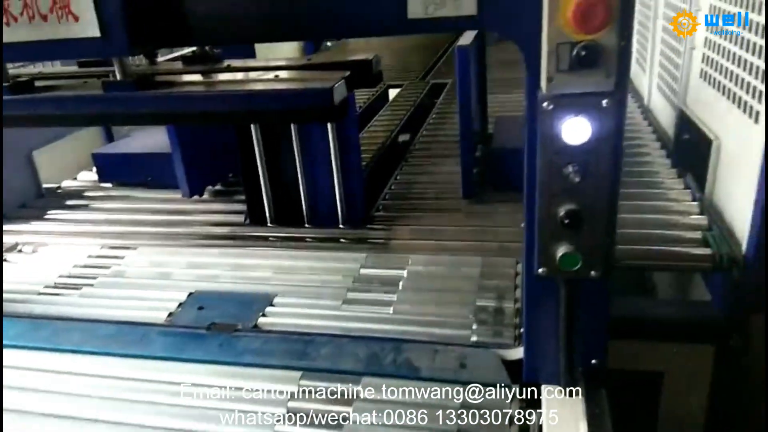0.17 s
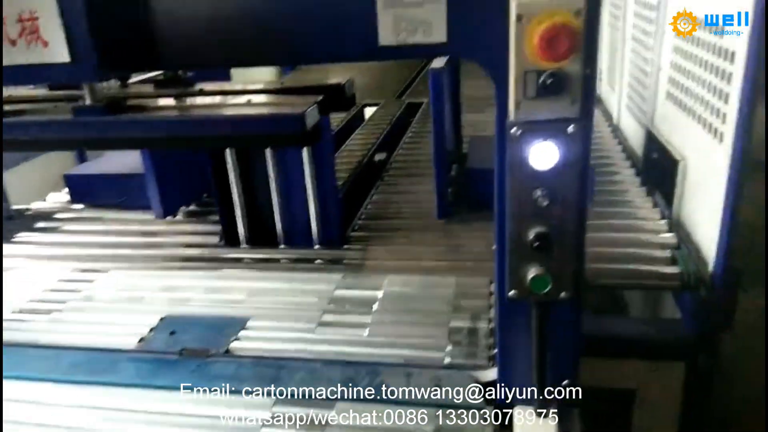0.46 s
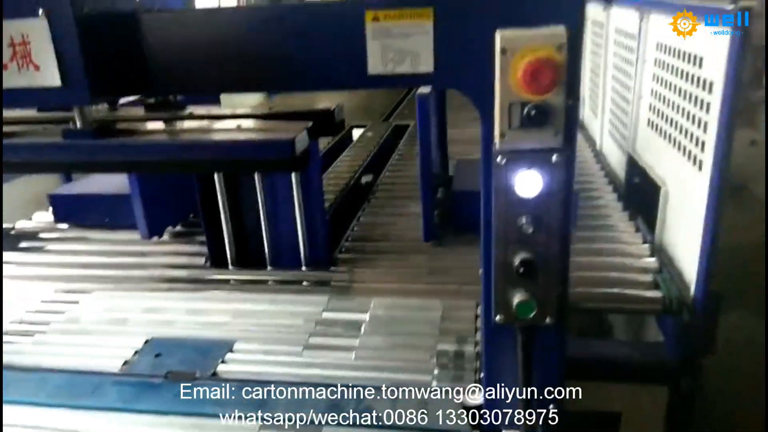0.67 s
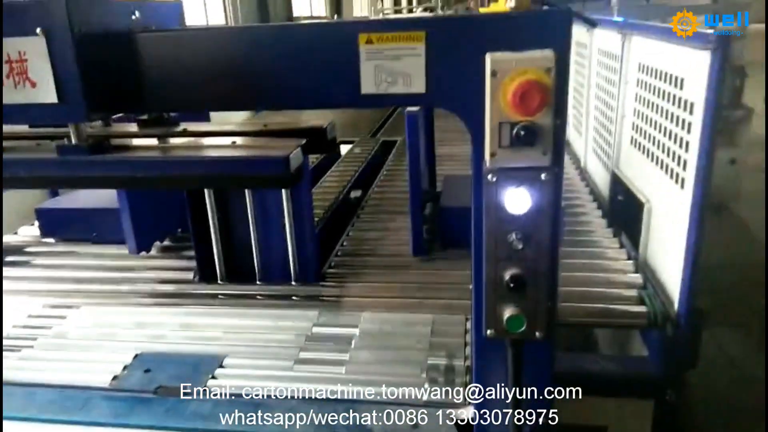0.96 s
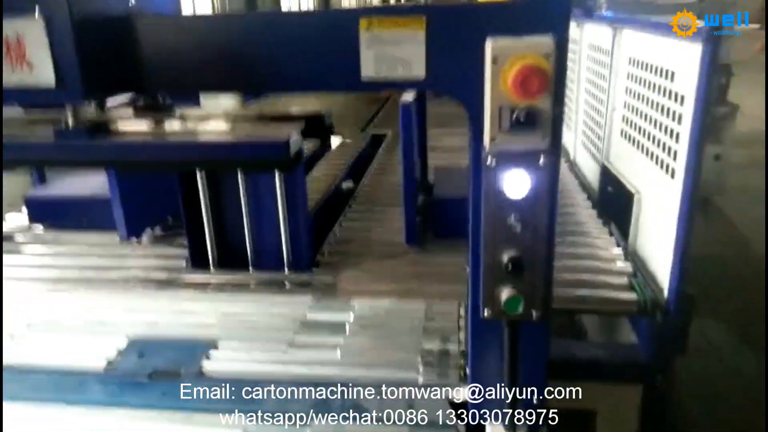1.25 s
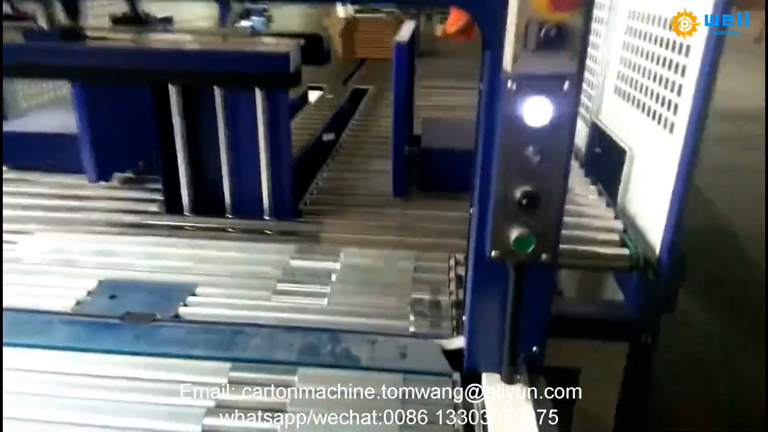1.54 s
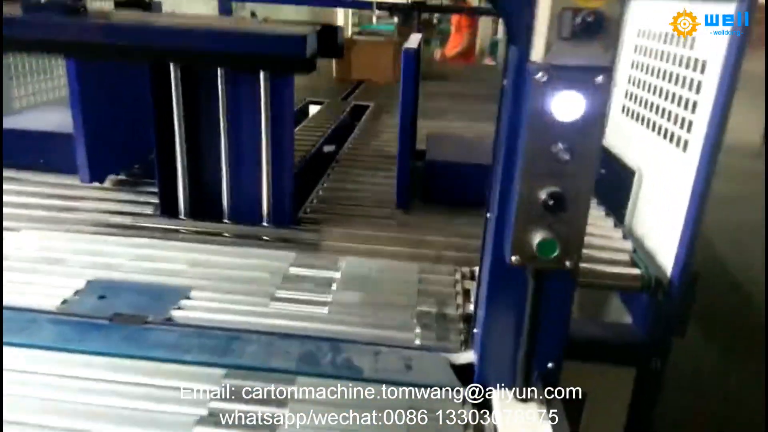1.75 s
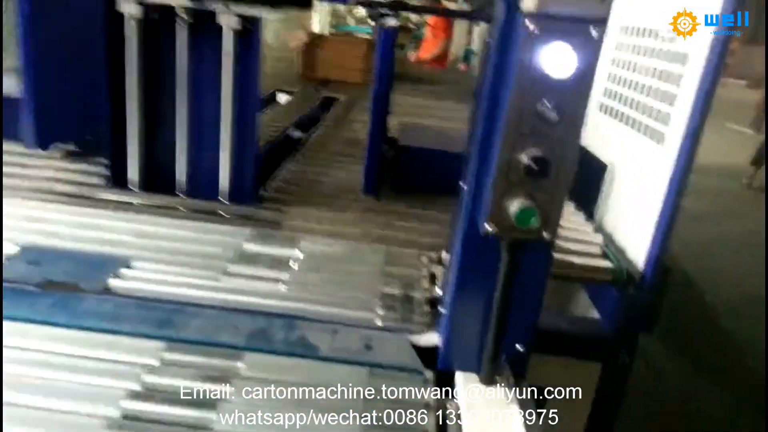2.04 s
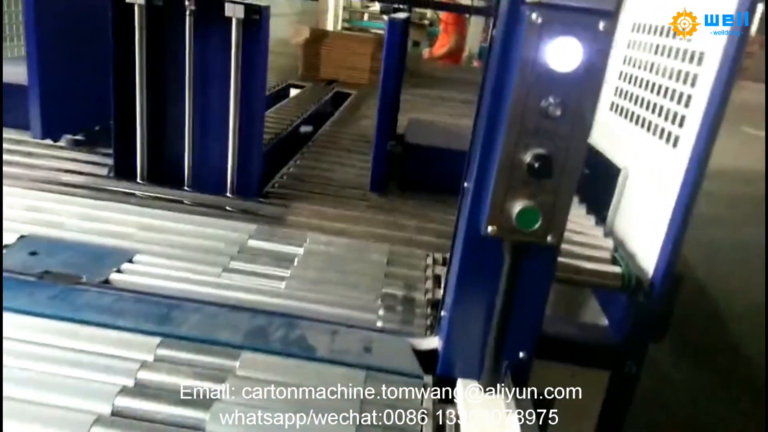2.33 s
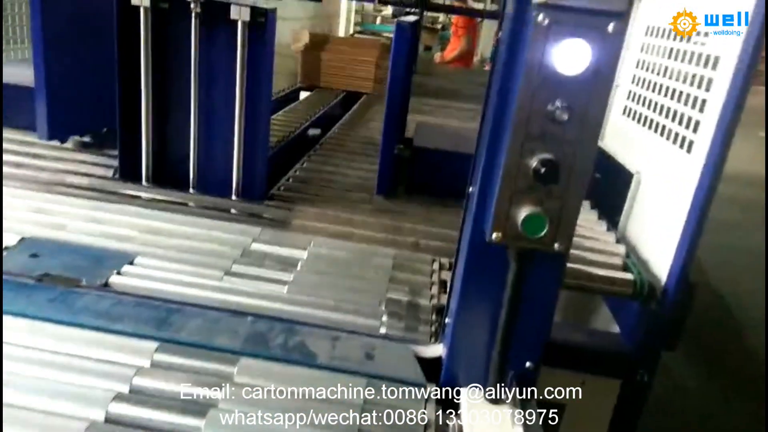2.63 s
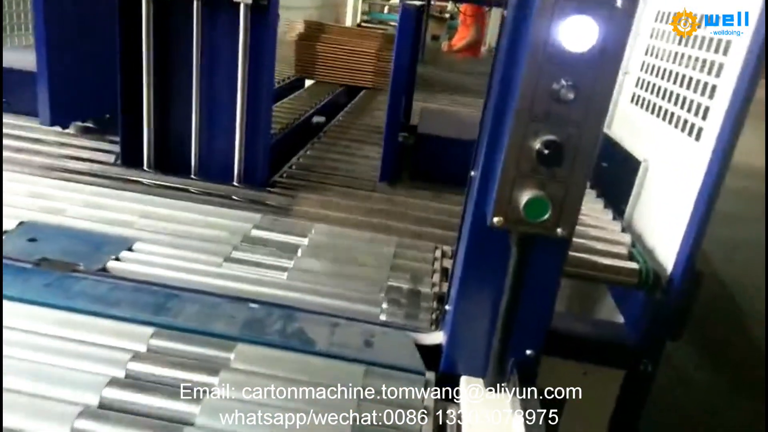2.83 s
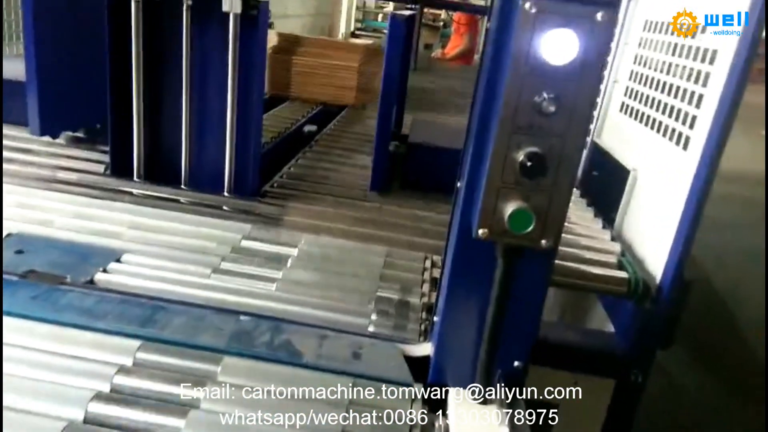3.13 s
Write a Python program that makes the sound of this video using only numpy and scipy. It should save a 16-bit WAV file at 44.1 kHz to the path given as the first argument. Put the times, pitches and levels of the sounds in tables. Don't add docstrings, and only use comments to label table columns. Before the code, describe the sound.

A carton folding machine carriage rattles on steel rails from the start, with a puff of air, and slams with bounces at 0.32 s. A second stroke from 0.57 s squeaks and sings over scraping cardboard, slamming harder and brighter at 0.94 s. Then rollers knock and jingle, busier from 1.7 s, with a faint air vent at 1.5 s and a thud and card scrape at 3.1 s; factory hum behind.

```python
import sys
import numpy as np
from scipy import signal
from scipy.fft import rfft, irfft
from scipy.io import wavfile

SR = 44100
rng = np.random.default_rng(int(sys.argv[2]) if len(sys.argv) > 2 else 0)


def makeup_ratio(level_db):
    decades = np.asarray(level_db, float) / 20
    return 10 ** decades


def persist_wave(psi):
    counts = np.round(np.clip(psi, -1, 1) * 32767).astype(np.int16)
    wavfile.write(sys.argv[1], SR, np.atleast_2d(counts).T)


N = 145089
TIME = np.arange(N) / SR

# (time [s], level [dB])
CONVEYOR_LOAD = [(0, -29), (.06, -50), (.3, -40.5), (.66, -38.5), (.71, -32), (.92, -32), (1.05, -36),
                 (1.58, -42), (1.7, -35), (1.9, -37), (2.2, -36), (2.26, -37), (2.55, -31.5), (2.62, -33.5),
                 (2.75, -30.5), (2.92, -36), (3.4, -31)]
# (frequency [Hz], density [dB per Hz])
LIGHT_STOP = [(290, -23), (700, -12), (1000, -12.5), (1420, -4.5), (2100, -15.5), (2730, -12), (3850, -3),
              (7860, -15), (14500, -19)]


def rms_one(x):
    return x / np.sqrt(np.mean(x ** 2) + 1e-20)


def curve(rows):
    s, db = np.transpose(rows)
    return makeup_ratio(np.interp(TIME, s, db, left=db[0] - 20, right=db[-1] - 60))


def noise():
    return rng.standard_normal(N)


def colour(x, points):
    hz, db = np.transpose(points)
    log_hz = np.log(np.arange(N // 2 + 1) * SR / N + 1)
    gain = makeup_ratio(np.interp(log_hz, np.log(hz), db))
    return rms_one(irfft(rfft(x) * gain, N))


def drift(rate):
    r = np.exp(-80 * np.pi * rate / SR)
    slow = signal.lfilter([1], [1, -2 * r, r * r], rng.standard_normal(N // 40 + 2002))[2000:]
    return np.interp(np.arange(N) / 40, np.arange(len(slow)), rms_one(slow))


def lowpass(x, order, cut_hz):
    return signal.sosfilt(signal.butter(order, cut_hz, fs=SR, output="sos"), x)


def dull(x):
    return lowpass(x, 4, 6150)


def resonate(x, hz, width_hz):
    r = np.exp(-np.pi * width_hz / SR)
    poles = [1, -2 * r * np.cos(2 * np.pi * hz / SR), r * r]
    return signal.lfilter([(1 - r * r) / 2, 0, (r * r - 1) / 2], poles, x)


def body(make, peaks, flicker_db, rate):
    out = np.zeros(N)
    for hz, width_hz, db in peaks:
        flicker = makeup_ratio(db + flicker_db * drift(rate))
        out += flicker * rms_one(resonate(make(), hz, width_hz))
    return rms_one(out)


def grains(per_s, spread_db):
    hits = rng.random(N) < per_s / SR
    size = makeup_ratio(spread_db * np.minimum(rng.exponential(1, N), 3))
    return hits * size * rng.choice([-1, 1], N) + 1e-9


def envelope(s, db, rise, t60):
    out, first = np.zeros(N), int(s * SR)
    t = np.arange(min(N - first, int((rise + 1.5 * t60) * SR))) / SR
    out[first:first + len(t)] = makeup_ratio(db) * np.minimum(t / rise, makeup_ratio(-60 * (t - rise) / t60))
    return out


def hall(x):
    t = np.arange(SR) / SR
    tail = rng.standard_normal(SR) * makeup_ratio(-60 * t / 0.61) * np.clip(t / 0.005, 0, 1)
    tail = lowpass(tail, 1, 6200)
    return makeup_ratio(-11.5) * signal.fftconvolve(x, tail / np.sqrt(np.sum(tail ** 2)))[:N]


def background():
    # (frequency [Hz], density [dB per Hz])
    wash = [(530, -5.5), (900, -4.5), (1350, -7.5), (2210, -7), (3620, -10.5), (6060, -10.5), (6350, -16.5),
            (8780, -18.5), (15800, -32)]
    # (frequency [Hz], density [dB per Hz])
    roar = [(25, -17), (60, -8.5), (260, -2), (420, -13.5), (650, -6.5), (950, -25), (1400, -59)]
    # (time [s], level [dB], rise [s], t60 [s])
    far_clatter = [
        (1.53, -48, 0.017, 0.84),
        (1.862, -50, 0.014, 0.22),
        (2.608, -44, 0.0079, 0.96),
    ]
    clatter = sum(envelope(*row) for row in far_clatter) * dull(colour(noise(), wash))
    far = clatter + makeup_ratio(-49.5) * colour(noise(), wash) + makeup_ratio(-41.5) * colour(noise(), roar)
    edges_hz = 20 * 2 ** np.arange(0, 10.1)
    out = np.zeros(N)
    for edge in zip(edges_hz, edges_hz[1:]):
        octave = signal.sosfilt(signal.butter(1, edge, "band", fs=SR, output="sos"), far)
        out += makeup_ratio(2 * drift(18.0)) * octave
    motor_hz, motor_width_hz = 5980, 42
    whine = resonate(resonate(noise(), motor_hz, motor_width_hz), motor_hz, motor_width_hz)
    return out + makeup_ratio(-61.5) * rms_one(whine)


def rollers():
    # (frequency [Hz], width [Hz], level [dB])
    frame = [(140.4, 12, -5.5), (180.5, 61, -6), (212, 41, -7), (266, 15, -0.5), (339.3, 33, -5),
             (577, 17, -9.5), (661, 69, -6), (767, 65, -12.5)]
    # (time [s], level [dB])
    drone = [(0, -50), (.22, -56), (.9, -42), (1.3, -43.5), (1.55, -54), (1.7, -42), (2.35, -46),
             (2.55, -42), (3.15, -36), (3.24, -34), (3.4, -44)]
    # (time [s], peak level [dB], pitch [Hz])
    knocks = [(0.061, -23, 326), (0.347, -31, 155), (0.674, -29, 170), (0.713, -19, 247),
              (0.749, -18.5, 223.6), (0.856, -23, 252), (0.884, -35, 287), (0.909, -27, 271),
              (1.224, -26, 253), (1.349, -23, 245), (1.624, -30.5, 195), (1.688, -22.5, 191),
              (1.733, -20, 262), (1.766, -21, 275), (1.823, -21, 228), (1.862, -23.5, 270),
              (1.954, -28, 224), (1.989, -27.5, 149), (2.126, -27.5, 261), (2.255, -20, 267),
              (2.306, -24.5, 252), (2.342, -24, 274), (2.404, -23, 186), (2.457, -25, 183),
              (2.486, -24, 307), (2.525, -22, 264), (2.555, -21.5, 182), (2.711, -20, 210),
              (2.808, -23.5, 245), (2.966, -29, 291), (3.042, -25, 246), (3.164, -25, 254),
              (3.243, -24.5, 285)]
    # (time [s], peak level [dB], pitch [Hz])
    taps = [(0.321, -29, 710), (0.459, -28, 774), (0.637, -29.5, 520), (0.813, -30, 495), (0.899, -36, 683),
            (1.799, -35, 670), (1.914, -32.5, 586), (1.959, -42, 587), (2.029, -29, 653), (2.107, -31, 656),
            (2.539, -36, 650), (2.675, -26, 672), (2.703, -26.5, 555), (2.787, -30.5, 560),
            (2.884, -31.5, 690), (2.921, -35, 548), (2.961, -27, 592), (3.008, -22, 570), (3.043, -32, 588),
            (3.107, -24.5, 674), (3.117, -33, 676), (3.141, -28, 563), (3.233, -26.5, 579)]

    def hit():
        return rms_one(grains(per_s=74, spread_db=3)) + 0.98 * noise()

    rumble = makeup_ratio(-0.5) * curve(CONVEYOR_LOAD) * body(hit, frame, flicker_db=4.0, rate=11.6)
    out = lowpass(rumble, 4, 1200)
    drive = resonate(resonate(noise(), 66, 27), 66, 174)
    out += curve(drone) * makeup_ratio(-0.5) * rms_one(drive)
    for table, trim_db, cycles in (knocks, -1.5, 27), (taps, -1, 72):
        for s, db, hz in table:
            out += envelope(s, db + trim_db, 1.2 / hz, cycles / hz) * np.sin(2 * np.pi * hz * (TIME - s))
    return out


def jingle():
    # (frequency [Hz], width [Hz], level [dB])
    parts = [(2190, 100, -1), (2580, 150, 0), (2880, 130, 0.5), (3570, 130, -9.5)]

    def tick():
        return resonate(grains(per_s=70, spread_db=1.14), 3000, 1400)

    return makeup_ratio(-21) * curve(CONVEYOR_LOAD) * dull(body(tick, parts, flicker_db=0.0, rate=6.9))


def cardboard():
    # (time [s], level [dB], rise [s], t60 [s])
    scrapes = [
        (0.699, -29.5, 0.0099, 0.68),
        (3.131, -28, 0.038, 0.26),
        (3.225, -42, 0.012, 0.2),
        (3.252, -41, 0.0066, 0.12),
        (3.271, -42.5, .008, 0.26),
    ]
    # (frequency [Hz], width [Hz], level [dB])
    first_sheet = [(1010, 93, 8), (1210, 51, 4), (1463, 35, -10), (1880, 100, -1)]
    # (frequency [Hz], width [Hz], level [dB])
    second_sheet = [(1206, 91, 2), (1857, 70, -0.5), (2080, 74, -3), (2566, 96, -0.5), (2830, 69, -17),
                    (4320, 150, -11)]
    # (frequency [Hz], density [dB per Hz])
    card = [(530, -42), (900, -21), (1190, 1), (1840, -2), (2340, -18), (2600, -10), (3100, -14),
            (12000, -53), (15600, -76), (22000, -120)]

    def rub():
        return grains(per_s=5000, spread_db=2.7)

    def rubbed(sheet):
        return body(rub, sheet, flicker_db=0.5, rate=46) + makeup_ratio(-5.0) * colour(rub(), card)

    later = sum(envelope(*row) for row in scrapes[1:])
    return dull(envelope(*scrapes[0]) * rubbed(first_sheet) + later * rubbed(second_sheet))


def valves():
    # (time [s], level [dB], rise [s], t60 [s])
    vents = [
        (0.046, -34.5, .002, .3),
        (.062, -35, 0.021, 0.92),
        (1.488, -41.5, 0.016, 1),
    ]
    # (frequency [Hz], density [dB per Hz])
    air = [(2000, -29), (3500, -8.5), (5440, -2.5), (8000, -6), (10500, -8), (14900, -14), (16000, -28)]
    return sum(envelope(*row) for row in vents) * colour(noise(), air) * makeup_ratio(0.5 * drift(41))


def thud():
    # (time [s], level [dB], rise [s], t60 [s], pitch [Hz])
    booms = [
        (0.941, -14.5, 0.023, 0.11, 248.5),
        (3.102, -16.5, 0.0046, 0.056, 268),
    ]
    out = np.zeros(N)
    for s, db, rise, t60, hz in booms:
        out += envelope(s, db, rise, t60) * np.sin(2 * np.pi * hz * (TIME - s))
    return out


def carriage():
    # (time [s], level [dB])
    first_stroke = [(0, -34), (.02, -34), (.04, -30.5), (.12, -32.5), (.2, -40), (.3, -40), (.45, -36.5),
                    (.56, -41.5), (.6, -59)]
    second_stroke = [(.55, -46), (.575, -36), (.64, -38), (.72, -36.5), (.85, -39), (.93, -38), (.96, -46)]
    # (frequency [Hz], width [Hz], level [dB])
    first_rail = [(2310, 60, -7), (2835, 61, -3.5), (3780, 370, -2), (4520, 190, 0), (5230, 160, -1.5),
                  (5930, 230, -11)]
    second_rail = [(4500, 440, -2), (4150, 490, 4.5), (5250, 500, 0), (6200, 200, -9)]
    # (frequency [Hz], density [dB per Hz])
    steel = [(180, -23), (300, 0), (1190, -8), (1430, -5.5), (2030, -10.5), (2740, -8), (4590, -11),
             (16000, -38)]
    # (time [s], level [dB], pitch [Hz], length [s])
    squeaks = [(.57, -37, 3590, .015), (.606, -33, 3580, .022), (.642, -34, 5390, .02),
               (2.48, -50, 3700, .02), (1.7, -50, 2380, .02), (1.645, -52, 2300, .015),
               (2.676, -50, 2620, .015), (2.49, -53, 2600, .02), (.405, -40, 1245, .03),
               (.51, -32, 712, .035), (.57, -35, 560, .05)]

    def slip():
        return grains(per_s=4000, spread_db=2.7)

    out = np.zeros(N)
    for stroke, rail in (first_stroke, first_rail), (second_stroke, second_rail):
        rattle = body(slip, rail, flicker_db=3.5, rate=45)
        out += curve(stroke) * (rattle + makeup_ratio(0.25) * colour(slip(), steel))
    for s, db, hz, length in squeaks:
        bump = np.sin(np.pi * np.clip((TIME - s) / length, 0, 1))
        out += makeup_ratio(db) * 2 ** .5 * bump * np.sin(2 * np.pi * hz * TIME + .4 * drift(60))
    return out


def singing():
    # (time [s], pitch [Hz], level [dB])
    guide = [(.61, 2830, -41), (.636, 2830, -34), (.69, 2830, -53), (.72, 2810, -35.5), (.76, 2846, -37.5),
             (.78, 2830, -41.5), (.92, 2830, -44), (.95, 2830, -51)]
    # (time [s], pitch [Hz], level [dB])
    bearing = [(.625, 3730, -50), (.64, 3780, -40), (.68, 3990, -51), (0.731, 4170, -39), (.765, 4200, -51),
               (.79, 4150, -38), (.86, 4310, -45), (.93, 4150, -38.5), (.96, 4150, -42)]
    out = np.zeros(N)
    for rows in guide, bearing:
        s, hz, db = np.transpose(rows)
        phase = 2 * np.pi * np.cumsum(np.interp(TIME, s, hz)) / SR + 1.2 * drift(26)
        out += curve(np.transpose([s, db])) * makeup_ratio(2 + 4.5 * drift(32)) * np.sin(phase)
    return out * (TIME > guide[0][0])


def stop(blows, spectrum, modes, ring_db):
    out = np.zeros(N)
    crash = colour(grains(20000, 1.1), spectrum) * makeup_ratio(0.72 * drift(200))
    softer = lowpass(crash, 1, 10400)
    for k, (s, db, t60) in enumerate(blows):
        if k < 2:
            out += envelope(s, db, 0.000097, t60) * crash
        else:
            out += envelope(s, db, 0.0025, t60) * softer
    for hz, mode_db, ring in modes:
        shape = sum(envelope(s, ring_db + mode_db + db - blows[0][1], 0.001, ring) for s, db, _ in blows[:3])
        out += shape * makeup_ratio(2 * drift(63)) * np.sin(2 * np.pi * hz * TIME + 1.07 * drift(63))
    return out


def latch():
    # (time [s], level [dB], t60 [s])
    ticks = [
        (.572, -30.5, 0.037),
        (.711, -34, 0.051),
    ]
    return stop(ticks, LIGHT_STOP, [], 0)


def first_stop():
    # (time [s], level [dB], t60 [s])
    blows = [
        (.3233, -16, 0.13),
        (.3268, -20, 0.14),
        (.3541, -22.5, 0.09),
        (.36, -20.5, 0.1),
        (.374, -28, 0.15),
        (.386, -42, 0.18),
    ]
    # (frequency [Hz], level [dB], t60 [s])
    modes = [(1440, -12, 0.12), (3050, -5, .05), (3800, -4, 0.15), (4150, -1, 0.07), (4620, -1, 0.06),
             (5250, -1, .08), (5850, -8, 0.09)]
    return stop(blows, LIGHT_STOP, modes, ring_db=-25)


def second_stop():
    # (time [s], level [dB], t60 [s])
    blows = [
        (.9413, -11.5, 0.028),
        (.9455, -15, 0.036),
        (.954, -21, .1),
        (.9645, -25, 0.21),
    ]
    # (frequency [Hz], density [dB per Hz])
    spectrum = [(290, -50), (900, -15.5), (1720, -5), (2260, -17), (3300, -8.5), (5240, -4), (7860, -18.5),
                (14000, -21.5), (16000, -31)]
    # (frequency [Hz], level [dB], t60 [s])
    modes = [(1650, -9, 0.04), (2498, -15, 0.09), (3600, -12, 0.11), (4100, -8, .1), (4931, -6, 0.16),
             (5180, 1, 0.06), (5330, 6, .045), (6100, -5, .045), (6900, -8, 0.025)]
    return stop(blows, spectrum, modes, ring_db=-19)


def scene():
    near = jingle() + cardboard() + valves() + carriage() + singing()
    near += latch() + first_stop() + second_stop()
    return (background() + rollers() + thud() + near + hall(near))[None]


def band_limit(x):
    return signal.sosfilt(signal.butter(12, 16500, fs=SR, output="sos"), x)


def record(dry):
    x = np.tanh(dry)
    x = signal.sosfilt(signal.butter(2, 40.2, "high", fs=SR, output="sos"), x)
    x = signal.sosfilt(signal.ellip(10, 1, 60, 15650, fs=SR, output="sos"), x)
    return band_limit(x)


dry = scene()
out = record(dry)
persist_wave(out)
```